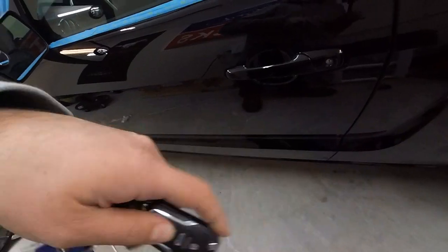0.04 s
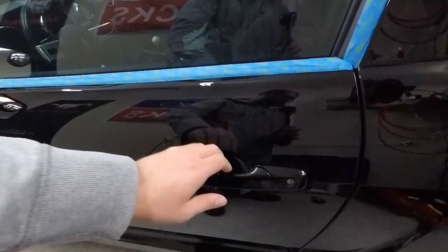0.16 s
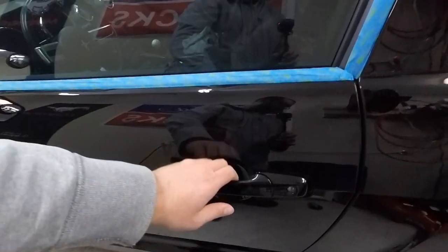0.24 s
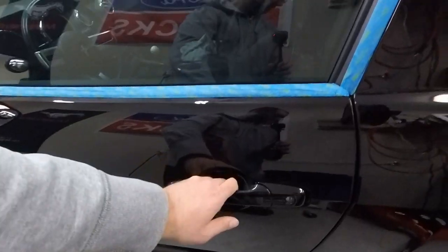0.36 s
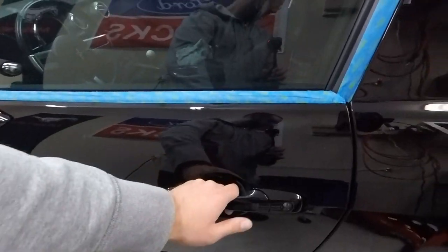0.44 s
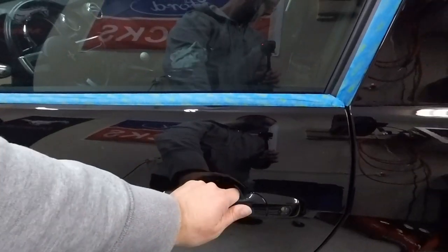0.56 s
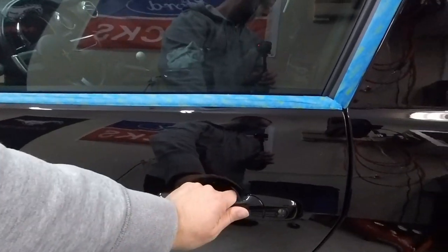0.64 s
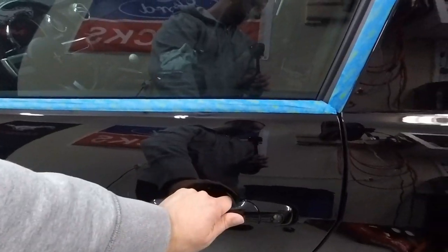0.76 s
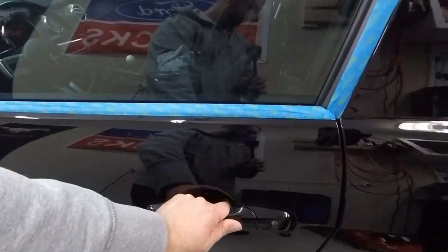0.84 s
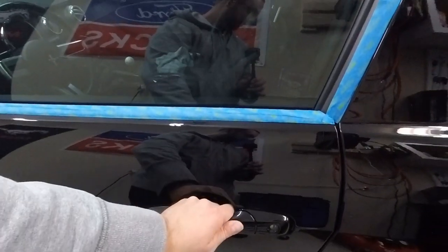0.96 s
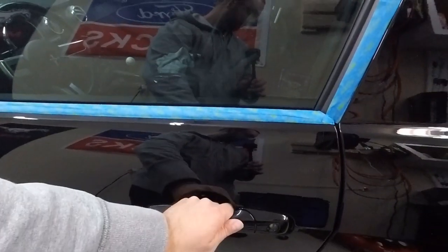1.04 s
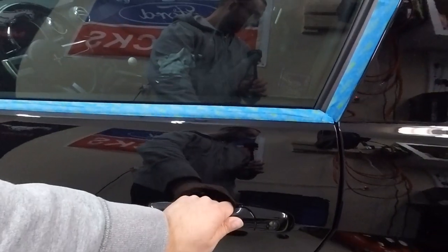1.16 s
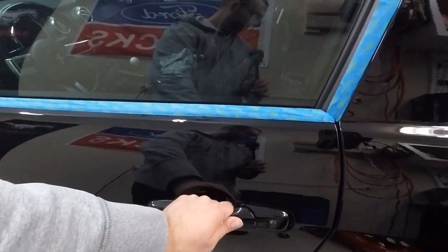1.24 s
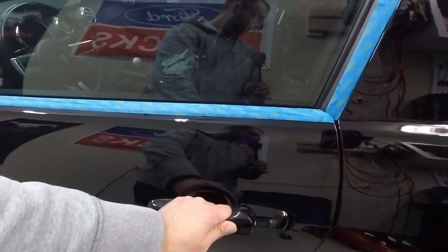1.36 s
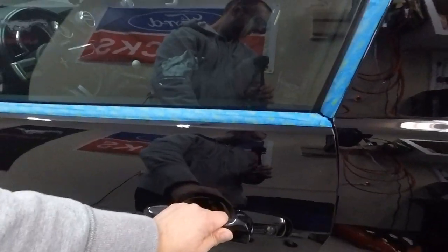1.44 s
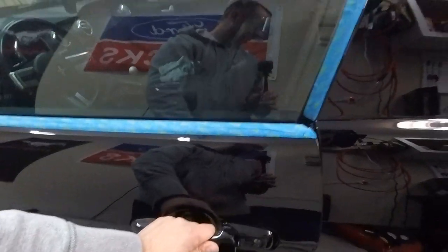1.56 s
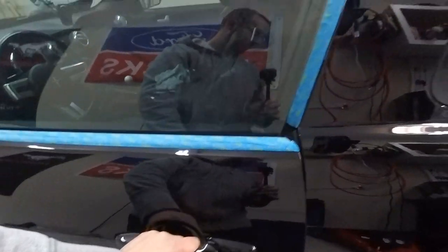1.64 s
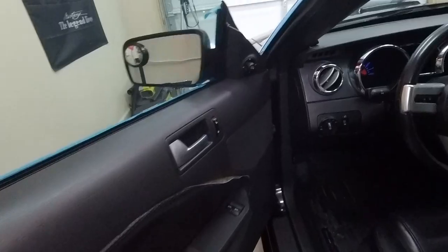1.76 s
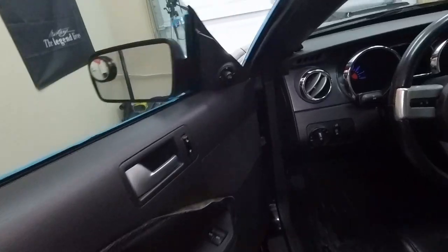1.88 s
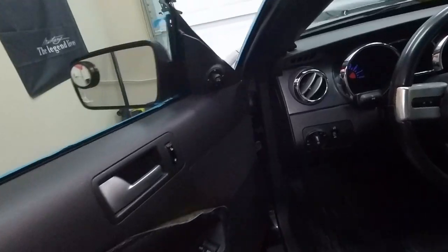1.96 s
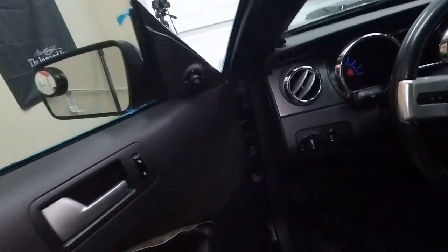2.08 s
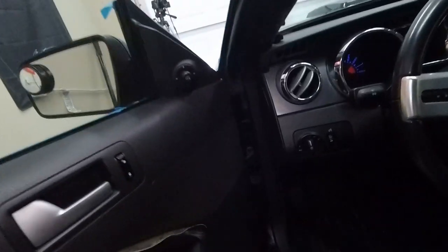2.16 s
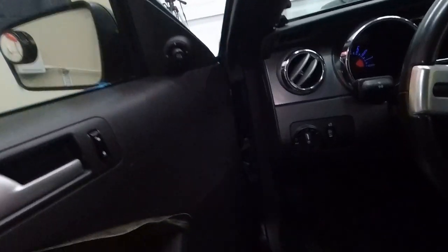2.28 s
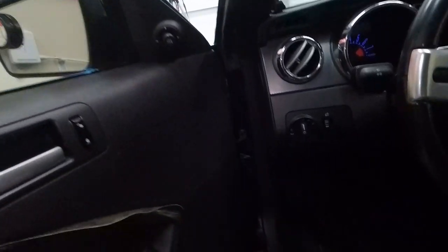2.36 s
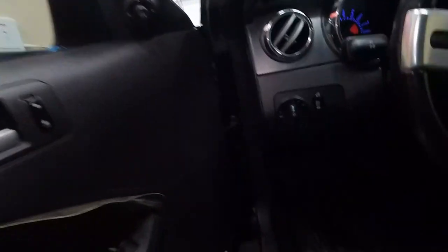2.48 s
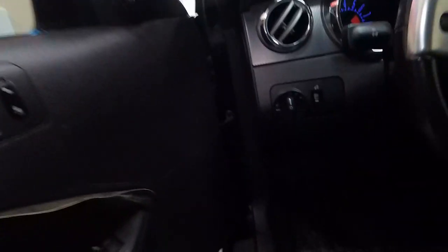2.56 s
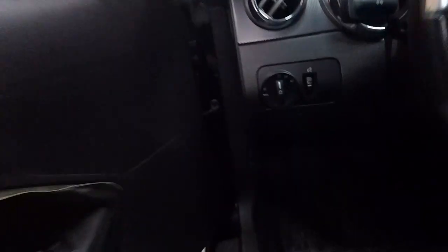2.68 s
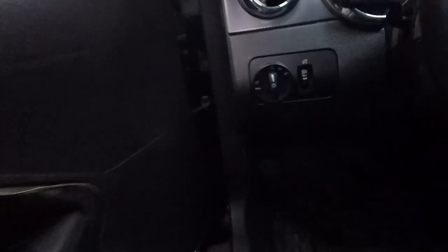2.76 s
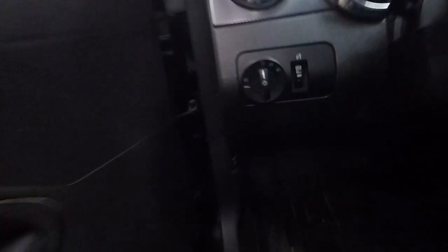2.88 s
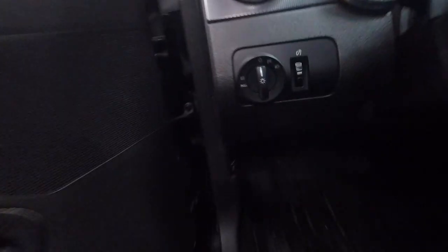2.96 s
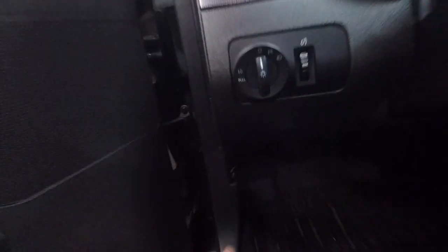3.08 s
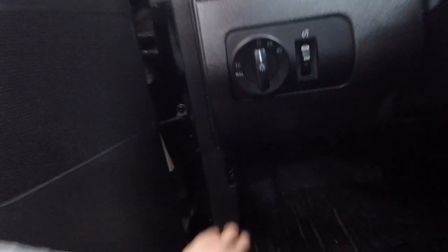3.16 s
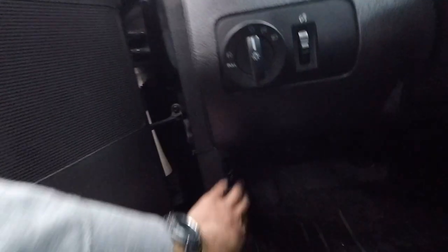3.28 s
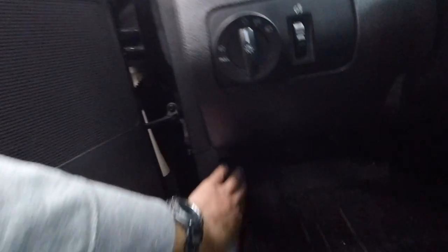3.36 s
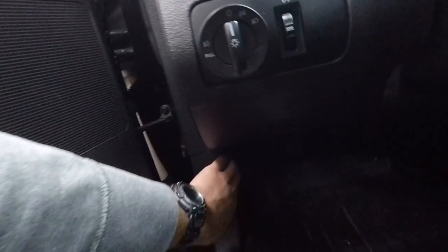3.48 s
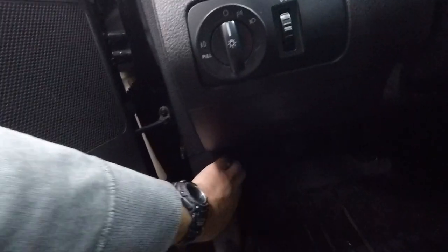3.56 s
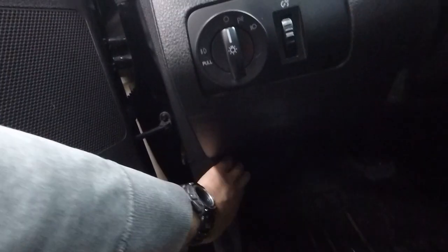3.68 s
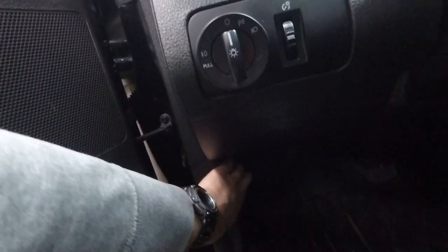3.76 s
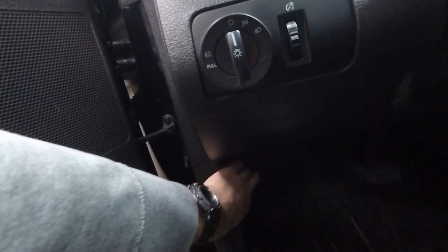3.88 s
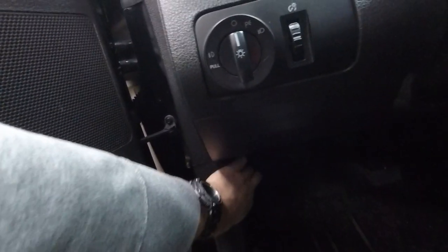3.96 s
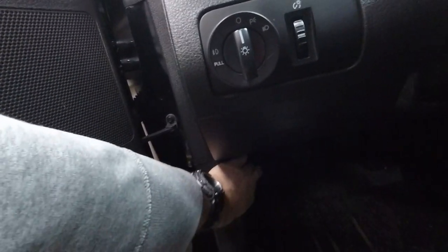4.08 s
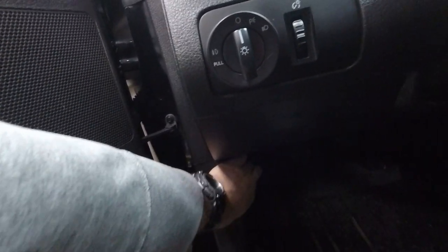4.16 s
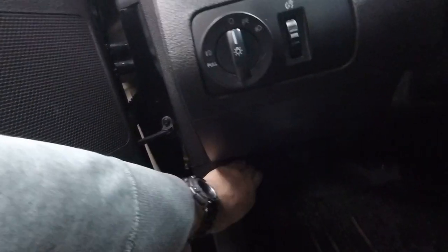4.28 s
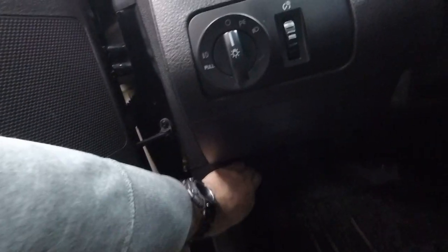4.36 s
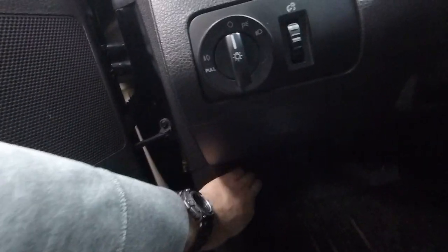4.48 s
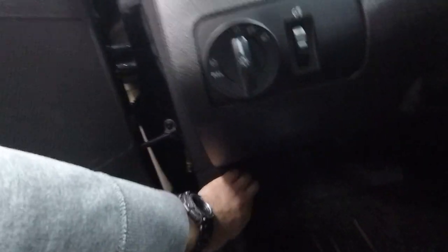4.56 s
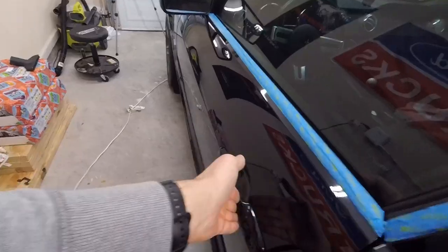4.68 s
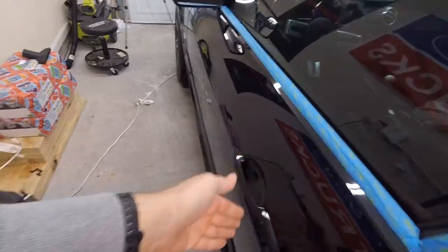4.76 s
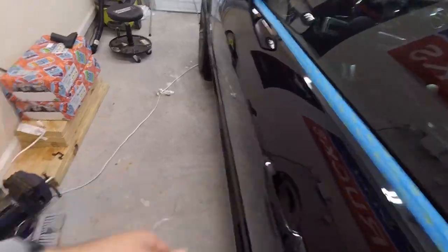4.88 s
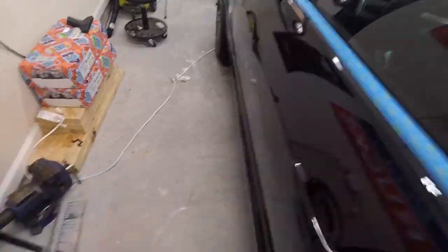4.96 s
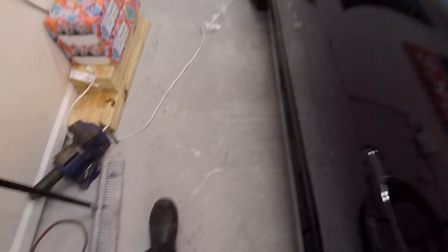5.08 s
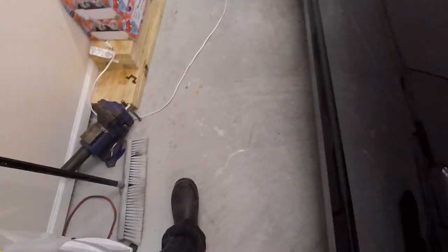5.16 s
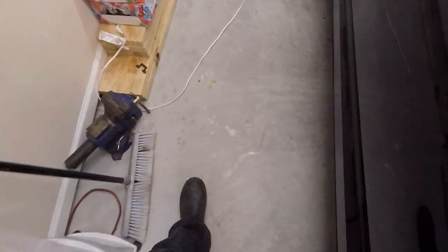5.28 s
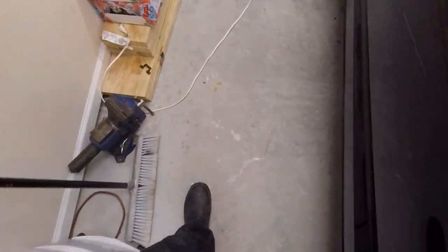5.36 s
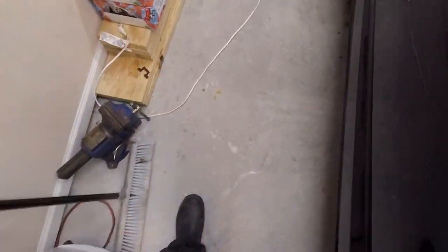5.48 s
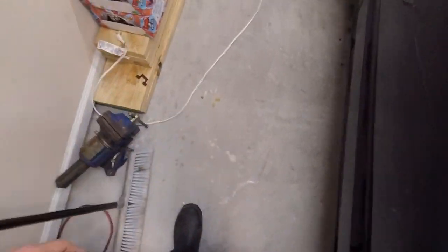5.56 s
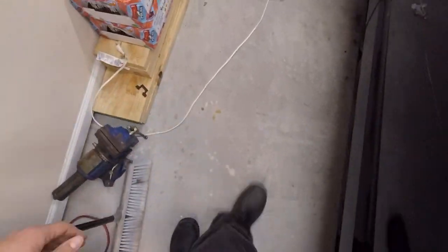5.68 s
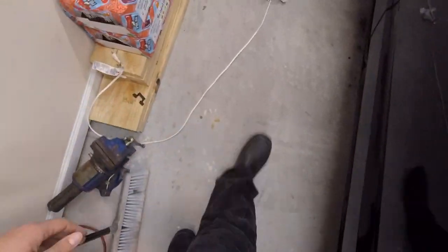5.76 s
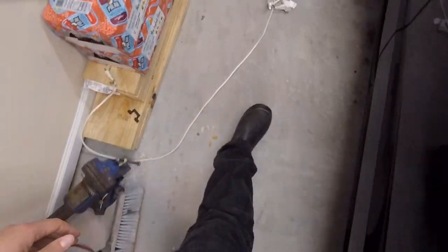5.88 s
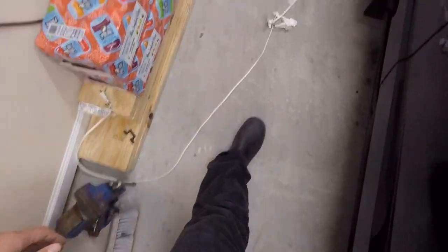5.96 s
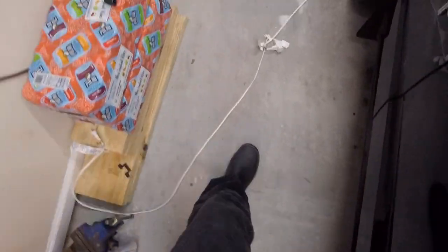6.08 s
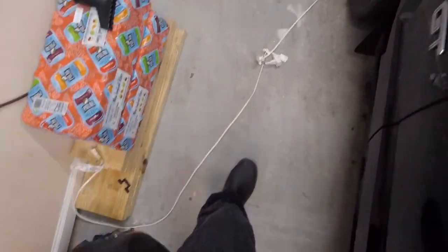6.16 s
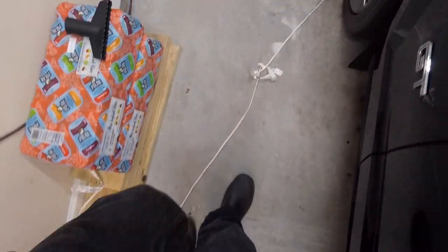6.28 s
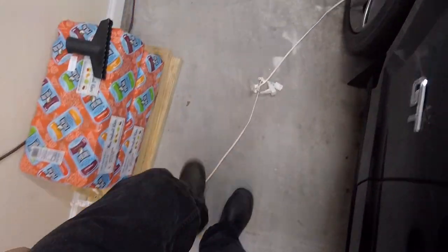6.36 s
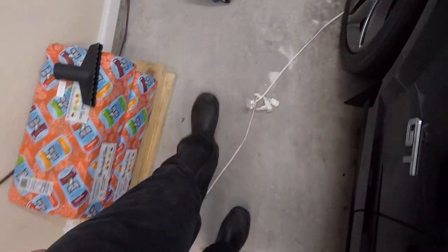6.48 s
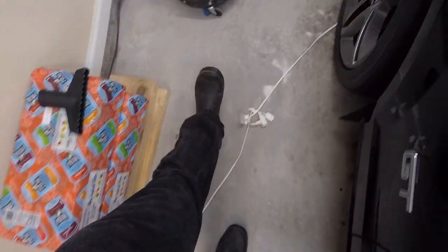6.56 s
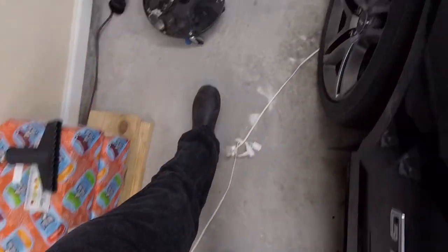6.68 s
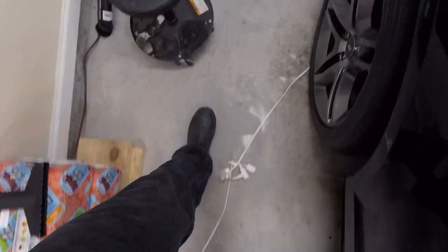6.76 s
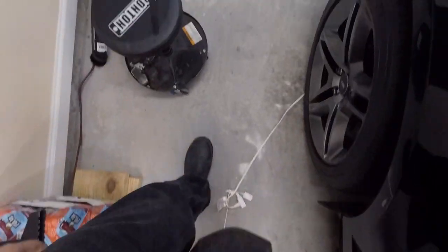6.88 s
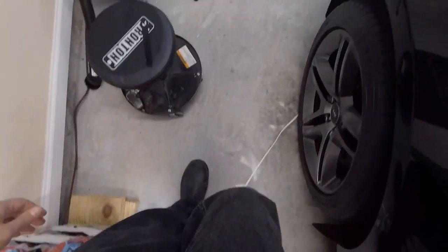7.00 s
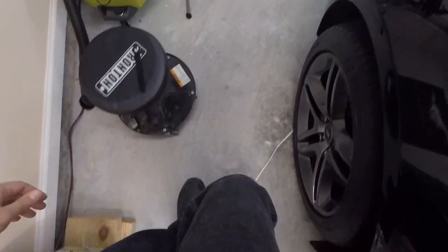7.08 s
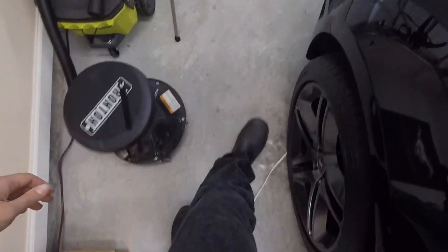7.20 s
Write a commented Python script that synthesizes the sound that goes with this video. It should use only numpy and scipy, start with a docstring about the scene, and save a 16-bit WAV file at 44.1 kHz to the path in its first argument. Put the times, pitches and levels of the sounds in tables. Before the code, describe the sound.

Soft handling knocks and tiny ticks open over steady hiss and hum. A car door unlatches in a cluster of hard, boomy clunks that shake the panels, followed by scattered light knocks. A plastic lever clicks, then a bright snap and double thump ring the car body with a deep swell. The door knocks shut, clothes rustle, and boots walk away, scuffing and creaking. Close camera microphone, short garage echo.

```python
"""Car door and hood in a closed garage

Hand-held camera: a door handle is pulled and the latch lets go, the hood lever clicks and the hood pops
on its catch, the door falls shut, boots walk off over concrete. Pushes ring the car body as damped modes;
ticks are short rings in noise bursts, knocks are decaying sines with the camera case; cloth and soles are
shaped noise, creaks fluttering tones. The garage answers with decaying noise echoes.
Hiss, hum, a thin whine and rumble lie underneath, past the wind filter."""
import sys
import numpy as np
from scipy import signal
from scipy.fft import rfft, irfft
from scipy.io import wavfile
from scipy.ndimage import uniform_filter1d

SR = 44100
rng = np.random.default_rng(int(sys.argv[2]) if len(sys.argv) > 2 else 0)


def wrap_up_sound(samples):
    """Save the sound to the file named by the first command line argument, as 16-bit audio."""
    columns = np.atleast_2d(samples).T
    # keep every value between -1 and 1, then stretch to whole-number steps
    tamed = np.clip(columns, -1, 1)
    steps = np.round(tamed * 32767).astype(np.int16)
    wavfile.write(sys.argv[1], SR, steps)


N = 318747
T = np.arange(N) / SR

# All levels are relative, ahead of the microphone filters and the camera's peak rounding.
# Background hiss spectrum: [f/Hz, density level/dB]
HISS_SPECTRUM = [(150, -72), (215, 11.5), (500, 2.5), (1000, -1.5), (2000, -6), (3200, -11), (4300, -16),
                 (6500, -11), (10500, -15.5), (12000, -23), (15300, -22.5)]
# Thin narrow hiss, nearly a tone: [t/s, level/dB]
WHINE_LEVEL = [(4.7, -41.5), (5.3, -59.5), (5.8, -61.5), (6.55, -58), (6.75, -53)]
# Deep rumble swelling up underneath: [t/s, swell/s, deep level/dB, upper level/dB, upper t60/s]
RUMBLE_SWELLS = [(1.33, 0.43, -68, -57, .03), (4.19, 0.55, -30, -36, 5.4)]
# Clothes rustling along with the walk: [t/s, level/dB]
RUSTLE_LEVEL = [(4.4, -50.5), (4.9, -39.5), (5.3, -57), (6.2, -57), (7.23, -54.5)]
# Sleeves, hand and boots scuffing: [t/s, level/dB, centre f/Hz, length/s]
SCUFF_STROKES = [(0, -48.5, 850, 0.077), (0.447, -46.5, 684, 0.23), (0.828, -49, 730, 0.17),
                 (1.784, -48.5, 566, 0.18), (3.768, -47, 1360, 0.17), (4.5, -43, 1130, 0.17),
                 (5.339, -50, 1320, 0.16), (5.61, -46, 1300, 0.18), (5.86, -54.5, 1140, 0.45),
                 (6.068, -54, 950, 0.12), (6.244, -49.5, 810, 0.21), (6.334, -51.5, 1670, 0.17),
                 (6.735, -54, 1530, 0.38), (7.055, -51, 1450, 0.14)]
# Airy, narrow swishes of cloth: [t/s, level/dB, centre f/Hz, length/s]
SWISH_STROKES = [(4.99, -50.5, 2020, 0.35), (4.97, -58, 3460, 0.41), (5.631, -46, 1600, 0.05),
                 (6.935, -51.5, 2110, 0.068), (7.09, -53, 4950, 0.07)]
# Leather and plastic creaking: [t/s, level/dB, length/s, pitch f/Hz]
CREAK_EVENTS = [(3.845, -80, 0.061, 4640), (6.17, -51.5, 0.045, 1150), (6.273, -50, 0.079, 1080),
                (6.335, -48, 0.23, 1163), (6.612, -51, 0.034, 1200), (6.697, -50, 0.16, 1205),
                (6.912, -50.5, 0.087, 1228)]
# Short knocks: camera case, door clunk, boot falls: [t/s, level/dB, pitch f/Hz]
KNOCK_EVENTS = [(0.128, -17, 274), (0.148, -41, 234), (0.45, -33, 197), (0.487, -25, 208),
                (0.57, -24.5, 201), (1.362, -6.5, 720), (1.404, -7, 178.4), (1.454, -8, 333),
                (1.59, -14.5, 186), (1.776, -20.5, 170), (1.863, -23.5, 345), (1.981, -24.5, 324),
                (2.101, -32, 410), (2.118, -32.5, 305), (2.316, -28.5, 335), (2.43, -36.5, 300),
                (2.556, -16, 174), (2.66, -32.5, 322), (3.466, -14.5, 332), (3.482, -23.5, 280),
                (3.497, -26, 252), (4.059, -27, 354), (4.631, -10, 270), (4.9139, -12.5, 1370),
                (5.148, -24, 182), (5.339, -25.5, 524), (5.863, -29.5, 320), (5.919, -21, 181),
                (6.044, -29, 222), (6.09, -29.5, 305), (6.65, -14.5, 202), (6.677, -19, 194),
                (6.784, -23.5, 250), (7.048, -28, 166)]
# Modes of the camera case: [f/Hz, level/dB, t60/s]
CASE_MODES = [(480, -4.5, 0.021), (748, -11.5, 0.037), (1210, -16.5, 0.01)]
# Small hard parts ticking: [t/s, level/dB, pitch f/Hz]
TICK_EVENTS = [(.092, -40.5, 7300), (0.104, -41, 6940), (0.175, -53, 5440), (.446, -36, 915),
               (.447, -43, 2650), (0.476, -43.5, 5860), (0.539, -48, 5470), (0.926, -49.5, 5400),
               (1.237, -31.5, 800), (1.27, -26, 1360), (1.355, -12, 754), (1.366, -40, 10000),
               (1.399, -32, 10800), (1.421, -26, 10600), (1.432, -29, 10200), (1.443, -28.5, 5150),
               (1.49, -33, 5000), (1.442, -28, 10500), (1.487, -31, 9800), (1.69, -32.5, 1330),
               (1.781, -45, 5000), (3.463, -31.5, 3960), (2.556, -36, 823), (3.466, -27.5, 2080),
               (3.466, -33.5, 5130), (3.464, -33, 1310), (3.749, -47.5, 5200), (3.75, -43.5, 1520),
               (3.795, -43, 3150), (3.795, -45.5, 5300), (4.036, -38.5, 5350), (4.038, -40, 10000),
               (4.056, -40.5, 5100), (4.054, -30.5, 1520), (4.117, -46, 5100), (4.172, -30.5, 5150),
               (4.178, -10.5, 5180), (4.175, -23.5, 10300), (4.169, -25, 1460), (4.176, -12.5, 1340),
               (4.632, -18, 770), (4.632, -40.5, 11500), (4.632, -37, 1780), (4.789, -26, 1190),
               (4.843, -46, 3660), (5.339, -30.5, 1750), (5.614, -40, 1950), (5.762, -42, 760),
               (5.861, -45, 1290), (5.917, -49, 1640), (6.088, -45, 800), (6.045, -41, 575),
               (6.781, -36, 950)]
# Blows on the car body: [t/s, boom level/dB, panel and latch level/dB, shudder t60/s]
BODY_BLOWS = [(1.257, -25, -39, 0.4), (1.345, -4.5, -19.5, 0.29), (1.37, -12, -30, 0.058),
              (1.39, -7.5, -31.5, 0.1), (1.419, -45, -30.5, 0.28), (1.441, -20, -32.5, 0.55),
              (1.455, -29, -33, 0.028), (3.795, -33.5, -39, 0.12), (4.18, -34, -24, 0.037),
              (4.191, -8.5, -16, 0.22), (4.205, -34, -12, 0.04), (4.226, -8.5, -15.5, 0.043),
              (4.25, -16, -20.5, 0.069), (4.276, -23, -31, 0.45), (4.631, -17, -31, 0.36),
              (4.785, -22, -28.5, 0.0085), (4.848, -16, -35.5, 0.12), (5.363, -54, -42, 0.087)]
# Low booming modes of the car body: [f/Hz, level/dB, t60/s]
BOOM_MODES = [(143, -6.5, 0.16), (191.2, -2.5, 0.11), (134.5, -7, 0.073)]
# Modes of the body panels: [f/Hz, level/dB, t60/s]
PANEL_MODES = [(258, 1.5, 0.052), (303.4, -5.5, 0.2), (346.5, -1.5, 0.095), (413.7, -6.5, 0.17),
               (475.5, -4.5, 0.075), (594, -6, 0.071), (658, -4, 0.079), (720, -4.5, 0.062),
               (811, -4, 0.021), (997, -11.5, 0.032), (1125, -10.5, 0.058), (1264, -6.5, 0.019)]
# Garage echo bands: [centre f/Hz, t60/s, level/dB]
GARAGE_BANDS = [(169, 0.47, -18.5), (510, 0.49, -15.5), (1540, 0.72, -26.5), (3700, 0.27, -21),
                (8100, 0.49, -15)]

HISS_DB, WHINE_HZ = -55.5, 786
HUM_DB, HUM_HZ, HUM_HALF_WIDTH_HZ = -50.5, 175, 26.6
RUMBLE_ATTACK_S, DEEP_T60_SHARE = 0.054, 0.66  # upper part's attack; deep t60 against upper t60
SCUFF_TREBLE_DB, SCUFF_ATTACK = -14, 0.14  # treble against body; share of the length
SWISH_WIDTH = 0.15  # either side of the centre, as a share
CRACKLE_PER_S, CRACKLE_CYCLES = 45, 12  # per pitch; cycles to fall 60 dB
CRACKLE_DB, CRACKLE_SPREAD_DB = -6, 5  # against the rustle; spread between slips
KNOCK_CYCLES, KNOCK_RISE_CYCLES = 13.1, 1.22  # cycles to fall 60 dB; cycles to rise
CASE_DB, CASE_DB_PER_OCTAVE = 5, 12  # under a 500 Hz knock; knocks further off in pitch wake it less
TICK_T60_S, TICK_KNEE_HZ = 0.087, 6300  # t60 far below the knee; parts above it die much sooner
PING_DB, PING_T60_SHARE = 7, 0.27  # clean ring against the burst
SHUDDER_RISE_S, CHATTER_PER_S = 0.01, 900
SHOVE_DB, TRIM_DB, CRACK_DB = 2, -4, -19  # against the panel level
PANEL_SHAKE_DB, SPRAY_DB = -25.5, -15.5  # chatter into the panels; top of the crack
TICK_ECHO_DB, KNOCK_ECHO_DB = -6.5, -7  # sent to the room, against the car body
MIC_DIP_HZ, MIC_DIP_HALF_WIDTH_HZ = 4112.5, 164.5
MIC_HZ, WIND_CUT_HZ, TOP_HZ = 11600, 141.4, 15400


def undb(db):
    """Decibels to amplitude."""
    return 10 ** (np.asarray(db) / 20)


def unit(x):
    """Scales to rms 1."""
    return x / np.sqrt(np.mean(x ** 2))


def fade(t, t60):
    """Falls 60 dB in t60, which is held to at least 2 ms."""
    return np.exp(-np.log(1000) * t / max(t60, .002))


def band(x, lo_hz, hi_hz, order=2):
    """Band-pass filter."""
    sos = signal.butter(order, [lo_hz, min(hi_hz, .45 * SR)], "band", fs=SR, output="sos")
    return signal.sosfilt(sos, x)


def noise(lo_hz, hi_hz, order=2):
    """Band noise of rms 1."""
    return unit(band(rng.standard_normal(N), lo_hz, hi_hz, order=order))


def walk(rate):
    """Slow random drift of rms about 1: steps smoothed twice."""
    hold = int(SR / rate)
    steps = np.repeat(rng.standard_normal(N // hold + 1), hold)
    return unit(uniform_filter1d(uniform_filter1d(steps, hold), hold)[:N])


def curve(rows):
    """Gain along a level table, all but silent outside it."""
    return undb(np.interp(T, *np.transpose(rows), -150, -150))


def add(out, s, x):
    """Mixes x into out from second s on."""
    i = int(s * SR)
    out[i:i + len(x)] += x[:N - i]


def ring(force, hz, t60):
    """One damped mode; a unit pulse gives a decaying sine that starts from unit amplitude."""
    pole = fade(1 / SR, t60) * np.exp(2j * np.pi * hz / SR)
    return signal.lfilter([0, pole.imag], [1, -2 * pole.real, abs(pole) ** 2], force)


def modes(force, table):
    """A force rings every mode of a table, with alternating sign."""
    return sum((-1) ** k * undb(db) * ring(force, hz, t60) for k, (hz, db, t60) in enumerate(table))


def push(size):
    """A soft pulse of unit area."""
    return np.hanning(size) / np.hanning(size).sum()


def stroke(length, attack):
    """Quick rise over a straight fall."""
    u = np.linspace(0, 1, int(max(length, .02) * SR))
    return np.minimum(u / max(attack, .02), 1) * (1 - u)


def hiss():
    """White noise coloured along the hiss spectrum, its level drifting slightly."""
    hz, (at, db) = np.fft.rfftfreq(N, 1 / SR), np.transpose(HISS_SPECTRUM)
    gain = undb(np.interp(np.log(hz + 1), np.log(at), db))
    coloured = unit(irfft(rfft(rng.standard_normal(N)) * gain, N))
    return undb(HISS_DB + 0.27 * walk(3.88)) * coloured


def hum():
    """A sine whose phase wanders, inside two bands of low noise."""
    line = np.sin(2 * np.pi * HUM_HZ * T + 0.5 * walk(3.2))
    wide = noise(HUM_HZ - HUM_HALF_WIDTH_HZ, HUM_HZ + HUM_HALF_WIDTH_HZ)
    steep = noise(148.0, 187.2, order=4)
    return undb(HUM_DB) * unit(wide + 2.0 * line + 1.4 * steep)


def whine():
    """Very narrow noise, nearly a tone."""
    return curve(WHINE_LEVEL) * noise(WHINE_HZ - 12, WHINE_HZ + 12, order=1)


def rumble():
    """Bass noise: the upper part comes in fast, the deepest grows all through the swell, then both die."""
    deep, upper = np.zeros((2, N))
    for s, swell, deep_db, upper_db, t60 in RUMBLE_SWELLS:
        after = np.maximum(T - swell, 0)
        add(deep, s, undb(deep_db) * np.minimum(T / swell, 1) * fade(after, DEEP_T60_SHARE * t60))
        add(upper, s, undb(upper_db) * np.minimum(T / RUMBLE_ATTACK_S, 1) * fade(after, t60))
    return deep * noise(29.0, 54.0) + upper * noise(25, 197)


def background():
    """The steady bed of hiss and hum with whine, rumble and a faint deep noise floor."""
    deep_floor = undb(-78.0) * noise(25, 51)
    return hiss() + hum() + whine() + rumble() + deep_floor


def crackle(hz):
    """Lone slips of uneven size, each a short ring."""
    slips = rng.random(N) < CRACKLE_PER_S / SR
    sizes = undb(CRACKLE_SPREAD_DB * rng.standard_normal(N))
    return ring(slips * sizes, hz, CRACKLE_CYCLES / hz)


def rubbing():
    """Cloth and soles slip in grains and gaps: noise strokes under a rough, fast-changing gain."""
    grains, strokes = unit(undb(3 * noise(15, 150))), np.zeros(N)
    for s, db, hz, length in SCUFF_STROKES:
        shape = stroke(length, SCUFF_ATTACK)
        body, treble = rng.standard_normal((2, len(shape)))
        colour = unit(band(body, hz / 2, hz * 1.75))
        colour += undb(SCUFF_TREBLE_DB) * unit(band(treble, 4540, 5800))
        add(strokes, s, undb(db) * shape * colour)
    for s, db, hz, length in SWISH_STROKES:
        shape = stroke(length, 0.34)
        air = band(rng.standard_normal(len(shape)), hz * (1 - SWISH_WIDTH), hz * (1 + SWISH_WIDTH))
        add(strokes, s, undb(db) * shape * unit(air))
    # folds of cloth come and go on their own, each in a part of the band
    folds = sum(undb(4 * walk(25)) * noise(hz / 1.3, hz * 1.3) for hz in (260, 400, 650, 1050))
    slips = sum(crackle(hz) for hz in (350, 620, 950, 1400))
    rustle = curve(RUSTLE_LEVEL)
    return grains * (strokes + rustle * unit(folds)) + rustle * undb(CRACKLE_DB) * unit(slips)


def creaks():
    """Stick and slip in one narrow resonance: a fluttering tone that holds, then lets go."""
    tones, flutter = np.zeros(N), noise(2.8, 53, order=1)
    for s, db, length, hz in CREAK_EVENTS:
        shape = np.sqrt(np.minimum(3 * stroke(length, 0.18), 1))
        add(tones, s, undb(db) * shape * np.sin(2 * np.pi * hz * T[:len(shape)]))
    return tones * flutter


def knocks():
    """A softly rising, decaying sine for the main mode, with the camera case modes alongside."""
    out, t = np.zeros(N), T[:SR // 4]
    case = sum(undb(db) * np.sin(2 * np.pi * hz * t) * fade(t, t60) for hz, db, t60 in CASE_MODES)
    for s, db, hz in KNOCK_EVENTS:
        rise = np.minimum(t * hz / KNOCK_RISE_CYCLES, 1) ** 2
        main = np.sin(2 * np.pi * hz * t) * fade(t, KNOCK_CYCLES / hz) * rise
        octaves = abs(np.log2(hz / 500))
        case_gain = undb(CASE_DB - CASE_DB_PER_OCTAVE * octaves)
        add(out, s, undb(db) * (main + case_gain * case * np.minimum(t * hz * 2, 1)))
    return out


def ticks():
    """A sharp click: a short ring at its pitch inside a wider noise burst."""
    out, t = np.zeros(N), T[:SR // 8]
    for s, db, hz in TICK_EVENTS:
        t60 = TICK_T60_S / (1 + (hz / TICK_KNEE_HZ) ** 3)
        onset = undb(db) / 2 * np.minimum(t * hz / 2, 1)  # rises over two cycles
        burst = unit(band(rng.standard_normal(len(t)), 0.4 * hz, 1.172 * hz)) * fade(t, t60)
        ping = undb(PING_DB) * np.sin(2 * np.pi * hz * t) * fade(t, PING_T60_SHARE * t60)
        add(out, s, onset * (burst + ping))
    return out


def car_body():
    """Each blow is a short push that shudders on: it booms low in the car body, rings panels and trim,
    cracks in the latch."""
    t, (boom, rattle, crack, shove) = T[:SR // 2], np.zeros((4, N))
    rise = np.minimum(t / SHUDDER_RISE_S, 1)
    for s, boom_db, db, t60 in BODY_BLOWS:
        shudder = rise * fade(t, t60)
        add(boom, s, undb(boom_db) * push(size=90))  # sizes in samples
        add(shove, s, undb(db + SHOVE_DB) * push(size=20))
        add(rattle, s, undb(db) * shudder)
        add(crack, s, undb(db + CRACK_DB) * shudder)
    # loose parts chatter in separate small impacts
    chatter = unit((rng.random(N) < CHATTER_PER_S / SR) * rng.standard_normal(N))
    low_boom = modes(boom, BOOM_MODES)
    panels = modes(shove + undb(PANEL_SHAKE_DB) * rattle * chatter, PANEL_MODES)
    grit = undb(1.98 * noise(30, 450))  # rough, fast-changing gain
    trim = undb(TRIM_DB) * rattle * grit * noise(380, 1920)
    spray = undb(SPRAY_DB) * (noise(4900, 6500) + noise(8100, 9700))
    latch = crack * grit * (noise(3300, 5300) + spray)
    return low_boom + panels + trim + latch


def garage(x):
    """Dense echoes that build up in under a millisecond and die band by band."""
    t, echo = T[:SR], np.zeros(SR)
    for hz, t60, db in GARAGE_BANDS:
        tilt = (hz / 1000) ** 0.25
        echo += undb(db) * tilt * fade(t, t60) * noise(hz / 2.32, hz * 2.0, order=1)[:SR]
    return signal.fftconvolve(x, undb(-30.5) * echo * np.minimum(t / 0.00076, 1))[:N]


def microphone(x):
    """A narrow dip in the treble, a roll-off at the top and a steep wind filter."""
    dip = band(x, MIC_DIP_HZ - MIC_DIP_HALF_WIDTH_HZ, MIC_DIP_HZ + MIC_DIP_HALF_WIDTH_HZ, order=1)
    x = signal.sosfilt(signal.butter(2, MIC_HZ, fs=SR, output="sos"), x - 0.3 * dip)
    # run both ways, the wind filter takes the bass out of every hit and rings a little ahead of it
    return signal.sosfiltfilt(signal.butter(8, WIND_CUT_HZ, "high", fs=SR, output="sos"), x)


def scene():
    """Everything near the microphone, over a background that bypasses its filters."""
    bed, rub, creak = background(), rubbing(), creaks()
    knock, tick, car = knocks(), ticks(), car_body()
    # what is close to the camera is much drier than the ringing car body
    room = garage(car + undb(TICK_ECHO_DB) * tick + undb(KNOCK_ECHO_DB) * knock)
    near = rub + creak + knock + tick + car + room
    return (microphone(near) + bed)[None]


def record(dry):
    """The camera rounds the loudest peaks and cuts the top."""
    rounded = np.tanh(0.76 * dry) / 0.66
    return signal.sosfilt(signal.ellip(8, .2, 70, TOP_HZ, fs=SR, output="sos"), rounded)


dry = scene()
out = record(dry)
wrap_up_sound(out)
```